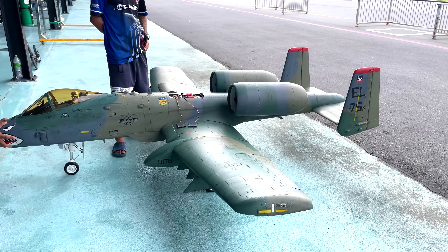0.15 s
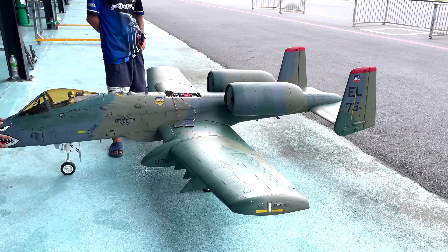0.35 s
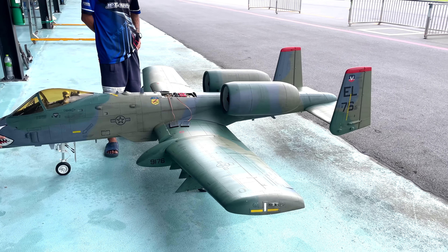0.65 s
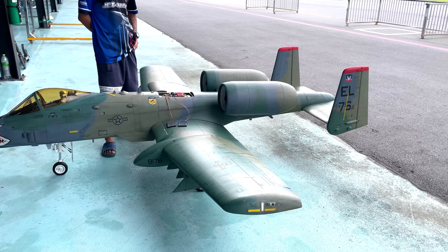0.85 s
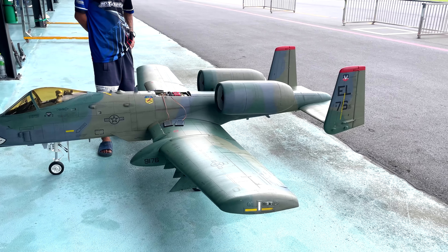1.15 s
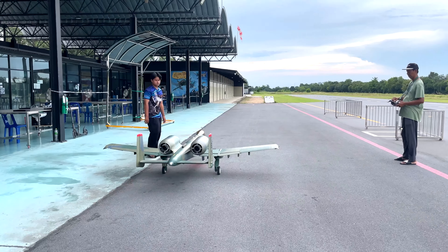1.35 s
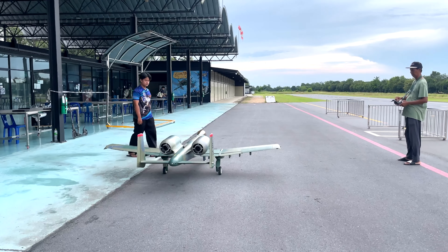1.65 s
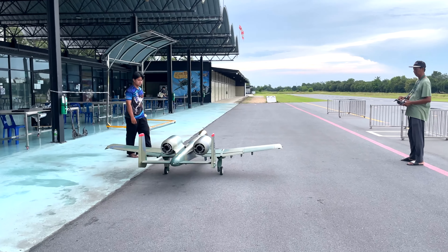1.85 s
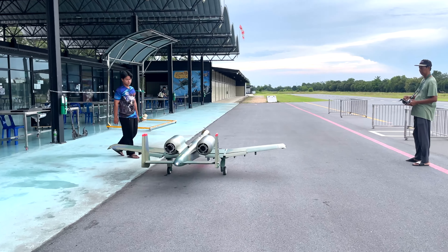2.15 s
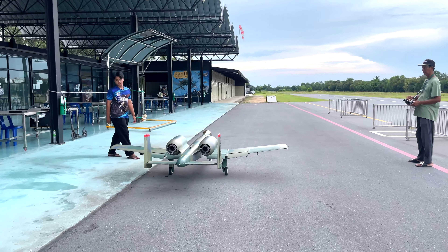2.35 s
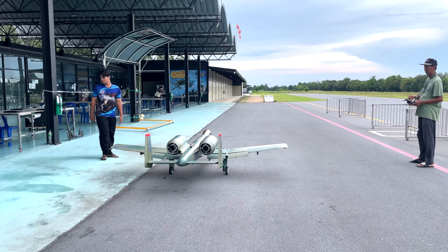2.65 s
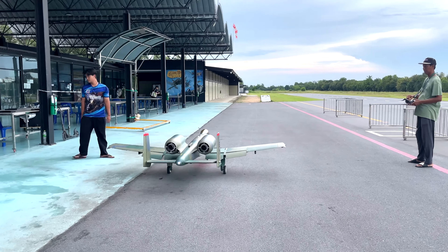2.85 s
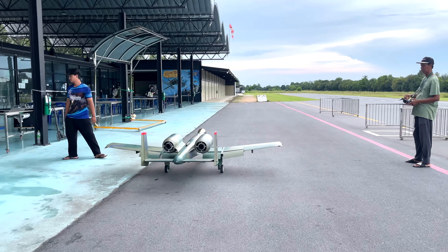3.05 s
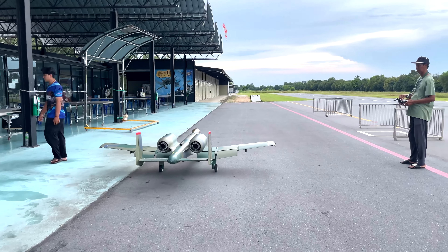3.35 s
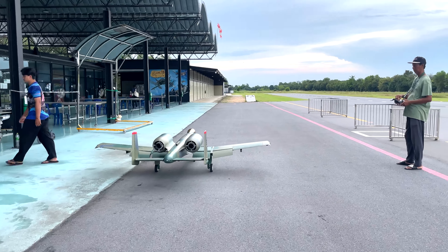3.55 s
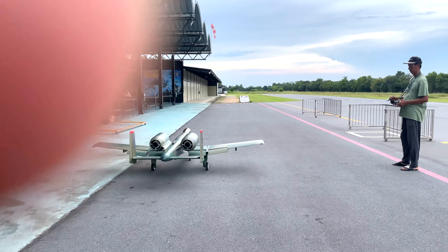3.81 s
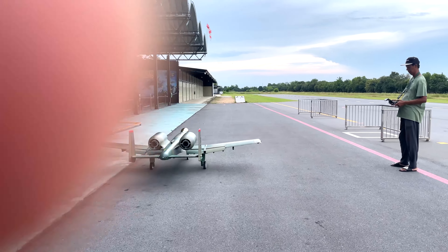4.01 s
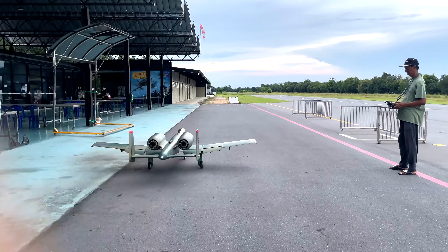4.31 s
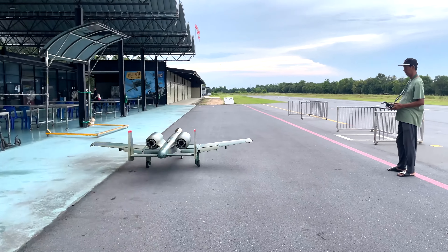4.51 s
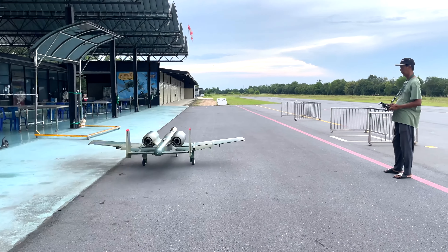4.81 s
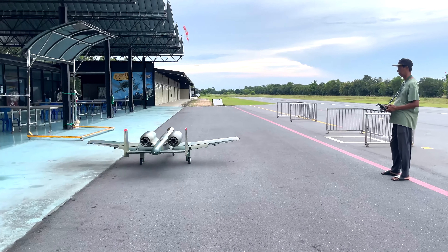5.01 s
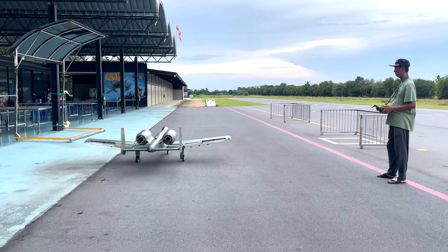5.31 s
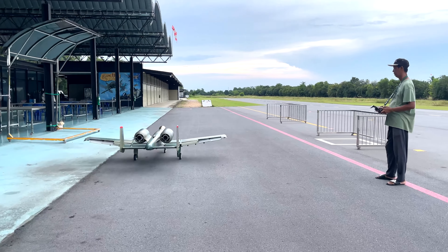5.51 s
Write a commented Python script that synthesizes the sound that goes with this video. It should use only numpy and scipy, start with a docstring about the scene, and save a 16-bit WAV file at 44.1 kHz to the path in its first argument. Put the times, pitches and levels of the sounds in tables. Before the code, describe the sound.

A model jet's twin turbines whistle and climb in pitch, then their exhaust rushes loudly and buffets the microphone outdoors.

```python
"""On an outdoor apron, a model jet with two turbines speeds up, heard from the side, then from behind.
Beside the intakes, the compressor blades whistle and beat against their own echo from a shelter roof,
over the hollow roar of burning fuel. From behind, the exhaust rushes and buffets the microphone,
while two whines, blurred by the hot gas, climb, level off and sag."""
import sys
import numpy as np
from scipy import signal
from scipy.fft import rfft, irfft
from scipy.io import wavfile

SR = 44100
rng = np.random.default_rng(int(sys.argv[2]) if len(sys.argv) > 2 else 0)


def transcribe(signal):
    """Save signal, clipped to [-1, 1], as a 16-bit WAV file at the path in sys.argv[1]."""
    frames = np.atleast_2d(signal).T
    limited = np.clip(frames, -1, 1)
    pcm = np.round(limited * 32767).astype(np.int16)
    wavfile.write(sys.argv[1], SR, pcm)


N = 250046
T = np.arange(N) / SR
HZ = np.fft.rfftfreq(N, 1 / SR)

# Shaft speeds heard from behind. Each row: time in seconds, first and second engine's speed in Hz.
REAR_SPEEDS = [(1.3, 590.6, 593.8), (1.7, 625, 628.8), (2.1, 665, 674.4), (2.5, 703.1, 721.3),
               (3, 747.2, 772.8), (3.5, 786.3, 810), (3.95, 811.3, 830), (4.3, 819.4, 833),
               (4.7, 813.1, 821.9), (5.67, 787.2, 792)]
# Blade tones heard from behind. Each row: multiple of the shaft speed, relative level in dB.
REAR_BLADE_TONES = [(8, -10), (16, 0), (24, -35)]
# A "colour" says how strong a noise is at each pitch. Each row: frequency in Hz, relative level in dB.
GAS_HISS_COLOUR = [(2000, -4), (3400, 0), (4100, -2), (5100, 2), (5550, -6.5), (6300, 0.5), (7500, -2.5),
                   (8600, -0.5), (9600, 2), (11000, -25)]
WAKE_COLOUR = [(30, -34), (60, 6), (110, 4.5), (170, -12), (300, -23.5), (800, -66)]


def from_db(db):
    """Turns decibels into a factor to multiply a sound by."""
    return 10 ** (np.asarray(db) / 20)


def unit(x):
    """Scales a signal to an average strength (rms) of 1."""
    return x / np.sqrt(np.mean(x ** 2) + 1e-20)


def over_time(rows):
    """Joins a table's points into curves over time, one for each column after the first."""
    seconds, *columns = np.transpose(rows)
    return [np.interp(T, seconds, column) for column in columns]


def over_hz(rows):
    """Joins a table's points into curves over frequency, one for each column after the first."""
    hz, *columns = np.transpose(rows)
    return [np.interp(np.log(HZ + 1), np.log(hz), column) for column in columns]


def bell(at_s, width_s):
    """A smooth rise and fall; the width says how far it spreads to each side."""
    return np.exp(-.5 * ((T - at_s) / width_s) ** 2)


def swells_db(rows):
    """Adds smooth swells and lulls into one level curve."""
    return sum(db * bell(at_s, width_s) for at_s, db, width_s in rows)


def wander(rate_hz):
    """A smooth random wobble, no faster than about the given rate."""
    return unit(irfft(rfft(rng.standard_normal(N)) * np.exp(-.5 * (HZ / rate_hz) ** 2), N))


def turbulence(colour, flutter_db, flutter_hz):
    """Two separate noises that swell together as swirls of air pass."""
    roll_off = 1 / (1 + (HZ / colour[-1][0]) ** 8)
    noise = irfft(rfft(rng.standard_normal((2, N))) * from_db(over_hz(colour)[0]) * roll_off, N)
    return unit(noise * from_db(flutter_db * wander(flutter_hz)))


def eddies(colour):
    """Swirling air with its pressure swings limited, so each gust lands with its own force."""
    swing = signal.hilbert(turbulence(colour, flutter_db=-1, flutter_hz=35))
    return unit(swing.real / np.hypot(abs(swing), 1))


def resonate(x, centre_hz, width_hz):
    """Brings out a band of sound around a moving pitch."""
    turn = np.exp(2j * np.pi * np.cumsum(centre_hz) / SR)
    decay = np.exp(-np.pi * width_hz / SR)
    return unit((turn * signal.lfilter([1 - decay], [1, -decay], x / turn)).real)


def ringing(modes, drift_hz=14):
    """Streaming gas sets off resonances; each flutters and drifts in pitch on its own."""
    sound = np.zeros((2, N))
    for hz, width_hz, db in modes:
        draught = turbulence(GAS_HISS_COLOUR, flutter_db=2.5, flutter_hz=14)
        centre_hz = hz + drift_hz * wander(1.8)
        sound += from_db(db) * resonate(resonate(draught, centre_hz, 2 * width_hz), centre_hz, width_hz)
    return sound


def delayed(x, seconds):
    """The same sound arriving later."""
    return np.interp(T - seconds, T, x, left=0)


def bounce(pair, seconds, share):
    """A quick echo off hard surfaces strengthens some pitches and weakens others."""
    return pair + share * np.array([delayed(x, seconds) for x in pair])


def shelter(x, fade_s):
    """The open steel shelter scatters sound into two blurs of echoes, falling 60 dB per fade_s."""
    tail = rng.standard_normal((2, SR // 2)) * from_db(-60 * T[:SR // 2] / fade_s)
    return signal.fftconvolve(x[None], tail / np.linalg.norm(tail[0]), axes=1)[:, :N]


def microphone(pair, ports):
    """The right opening hears part of the left one's sound, shifted in phase, and part of its own."""
    lead, likeness, balance_db = over_hz(ports)
    left, other = rfft(pair)
    right = (likeness * left + np.sqrt(1 - likeness ** 2) * other) * np.exp(-1j * lead)
    tilt = from_db(balance_db / 2)
    return irfft(np.array([left * tilt, right / tilt]), N)


def thrust_db(power, leave_s=3.8, fade_db_per_s=1):
    """Exhaust noise grows as a power of the shaft speed and fades as the jet rolls away."""
    shaft_hz = over_time(REAR_SPEEDS)[0]
    return 20 * power * np.log10(shaft_hz / shaft_hz.max()) - fade_db_per_s * np.maximum(T - leave_s, 0)


def wake_buffet():
    """Air stirred up by the jet tumbles over the microphone."""
    return from_db(-28.5) * turbulence(WAKE_COLOUR, flutter_db=2, flutter_hz=3.3)


def gusts(thump_width_s=.016):
    """Hard swirls hit the microphone, each with a low thump, a slap and a slow, deep push."""
    # Each row: time in seconds, slap level in dB, slap width in seconds, thump level in dB.
    hits = [(1.309, -38, 0.0067, -23), (1.39, -38, 0.022, -26.5), (1.542, -25.5, 0.059, -19.5),
            (1.68, -24.5, 0.028, -22.5), (1.758, -21, 0.0079, -25), (1.901, -26, 0.016, -21.5),
            (2.125, -40, 0.016, -20), (2.754, -19, 0.0086, -29), (2.889, -29, 0.014, -36),
            (2.955, -17.5, 0.028, -23), (3.151, -16.5, 0.009, -36), (3.244, -24.5, 0.022, -27),
            (3.413, -19.5, 0.017, -25), (3.516, -15.5, 0.015, -25), (3.569, -22, 0.0061, -22.5),
            (3.793, -20.5, 0.0095, -28), (3.967, -16, 0.008, -24.5), (4.237, -24, 0.013, -21.5),
            (4.602, -22, 0.0085, -33), (4.83, -16, 0.0063, -26), (4.869, -11, 0.0061, -28),
            (5.251, -22, 0.0079, -27), (5.354, -19, 0.01, -17)]
    # Colours of the slap and the push. Each row: frequency in Hz, relative level in dB.
    slap_colour = [(55, -2), (260, 4.5), (400, -9.5), (700, -18), (2000, -40)]
    push_colour = [(26, -11), (40, -10), (65, -5)]
    thumps = sum(from_db(db) * bell(at_s, thump_width_s) for at_s, _, _, db in hits)
    slaps = sum(from_db(db) * bell(at_s, width_s) for at_s, db, width_s, _ in hits)
    pushes = np.max([from_db(db - 12) * bell(at_s, 2 * thump_width_s) for at_s, _, _, db in hits], axis=0)
    return thumps * eddies(WAKE_COLOUR) + slaps * eddies(slap_colour) + pushes * eddies(push_colour)


def exhaust_rumble():
    """The churning exhaust rumbles, louder as the shaft turns faster."""
    # Colour of the churning. Each row: frequency in Hz, relative level in dB.
    colour = [(60, -5), (140, 4), (215, 1.5), (290, -3.5), (400, -6.5), (600, -12.5), (1500, -16)]
    # Centre of the rumble. Each row: time in seconds, pitch in Hz.
    pitch = [(1.3, 194), (2.3, 174), (2.9, 200), (4.2, 245.5), (5.67, 231)]
    churn = turbulence(colour, flutter_db=1.4, flutter_hz=27.1)
    return from_db(-21 + thrust_db(power=2.27)) * resonate(churn, over_time(pitch)[0], width_hz=110)


def combustion_roar(fade_db_per_s=2):
    """Burning fuel makes a hollow roar that slowly fades."""
    # Colour of the roar. Each row: frequency in Hz, relative level in dB.
    colour = [(42, -31), (65, -11.5), (135, -16.5), (180, -4.5), (218, -0.5), (260, -4.5), (320, -19.5),
              (390, -9), (470, -8), (600, -21.5), (1200, -22), (1700, -33), (4000, -73)]
    return from_db(-24.5 - fade_db_per_s * T) * turbulence(colour, flutter_db=1.5, flutter_hz=10)


def intake_hiss():
    """Air hisses as it is drawn into the engines."""
    # Colour of the hiss. Each row: frequency in Hz, relative level in dB.
    colour = [(900, -30), (1700, -6.5), (2000, 3.5), (2400, -2), (3000, 3.5), (3700, -4.5), (4600, 0),
              (5700, -10), (6800, 4), (7400, -8.5), (8200, -11), (9500, -12), (11500, -2.5), (12600, -10),
              (13600, -32)]
    return from_db(-38.5) * turbulence(colour, flutter_db=1, flutter_hz=11)


def exhaust_rush():
    """Hot gas mixes with the air: it rushes, tears at full thrust, hisses, howls and rings the tailpipe."""
    # Colours of the rush and its tearing edge. Each row: frequency in Hz, relative level in dB.
    rush_colour = [(200, -2), (330, 4), (480, 0), (620, -5.5), (800, 1), (1230, 0), (1500, -7),
                   (2300, -12.5), (2800, -10.5), (3500, -19.5), (6000, -37)]
    tearing_colour = [(950, -9), (1250, 6.5), (1700, -2.5), (2300, -8.5), (3700, -5.5), (5500, -16)]
    # Resonances of the howl and the tailpipe. Each row: pitch in Hz, width in Hz, base level in dB.
    howl_modes = [(797, 97, -40), (1086, 79, -40.5)]
    pipe_modes = [(2065, 150, -49), (2736, 230, -47)]
    # Swells and lulls of rush and tailpipe. Each row: time in seconds, change in dB, width in seconds.
    rush_swells = [(2.26, 2.5, 0.13), (3.78, 1.5, 0.18), (4.95, -0.3, 0.37)]
    pipe_swells = [(1.38, -7, 0.067), (1.68, 3.5, 0.12), (2.17, 7.5, 0.044), (2.4, -12, 0.071),
                   (3.06, 3, 0.03)]
    flow_db = thrust_db(power=1.51) + swells_db(rush_swells)
    rush = from_db(-30 + flow_db) * turbulence(rush_colour, flutter_db=.43, flutter_hz=19)
    tearing = from_db(-41 + 2.9 * flow_db) * turbulence(tearing_colour, flutter_db=2, flutter_hz=11)
    hiss = from_db(-39 + .63 * flow_db) * turbulence(GAS_HISS_COLOUR, flutter_db=.85, flutter_hz=21)
    howl = from_db(flow_db) * ringing(howl_modes)
    tailpipe = from_db(thrust_db(power=1) + swells_db(pipe_swells)) * ringing(pipe_modes)
    return bounce(rush + tearing + hiss + tailpipe, seconds=.0059, share=.22) + howl


def high_hiss(onset_hz=692, onset_width_hz=18):
    """A high hiss fades in around 2.4 s and then sits just below the whine."""
    # Colour of the hiss. Each row: distance below the whine in Hz, relative level in dB.
    colour = [(3000, 0), (4000, -4), (4800, -24)]
    shaft_hz = over_time(REAR_SPEEDS)[0]
    fade_in = 1 / (1 + np.exp((onset_hz - shaft_hz) / onset_width_hz))
    noise = signal.hilbert(turbulence(colour, flutter_db=.5, flutter_hz=20))
    below_whine = np.exp(-2j * np.pi * REAR_BLADE_TONES[1][0] * np.cumsum(shaft_hz) / SR)
    return from_db(-47.5) * fade_in * (noise * below_whine).real


def exhaust_whine(second_engine_db=-5, waver_db=2, echo_db=-8, echo_top_hz=13900):
    """Blade tones blur as they cross the hot jet; the shelter's echo trails below them as they climb."""
    # Loudness of the lowest tone and of the two above it. Each row: time in seconds, base level in dB.
    low_levels = [(2.9, -53), (3.4, -45), (4.12, -47), (4.26, -36.5), (4.42, -51), (4.88, -44), (5.5, -47)]
    high_levels = [(1.3, -32), (1.6, -35.5), (1.85, -32.5), (2.03, -32.5), (2.14, -31.5), (2.6, -35),
                   (2.9, -37), (3.4, -42), (4.3, -45.5), (5.67, -43)]
    # Narrow, medium and wide blur. Each row: strength, spread to each side in Hz.
    blurs = [(.6, 22), (.55, 70), (.16, 160)]
    whine = np.zeros(N)
    low = from_db(over_time(low_levels)[0])
    for shaft_hz, engine_db in zip(over_time(REAR_SPEEDS), (0, second_engine_db)):
        angle = 2 * np.pi * np.cumsum(shaft_hz) / SR
        high = from_db(over_time(high_levels)[0] + waver_db * wander(3.3))
        narrow, medium, wide = (share * (wander(hz) + 1j * wander(hz)) for share, hz in blurs)
        scatters = 3 * narrow + medium, narrow + medium + wide, narrow + medium  # low tones blur less
        for (multiple, db), scatter, gain in zip(REAR_BLADE_TONES, scatters, (low, high, high)):
            tone = unit((scatter * np.exp(1j * multiple * angle)).real)
            whine += gain * from_db(engine_db + db) * tone
    early = np.array([whine, shelter(whine, fade_s=.089)[0]])
    returned = irfft(rfft(whine) * (HZ < echo_top_hz), N)
    return early + from_db(echo_db) * shelter(returned, fade_s=1.3)


def roof_echo(tones, delay_s=2071 / SR, share=.68, dull_above_hz=4600):
    """The roof sends tones back late and with less treble, and the shelter scatters them."""
    returned = irfft(rfft(tones) * np.minimum(1, dull_above_hz / (HZ + 1)) ** 2.13, N)
    left, other = shelter(returned, fade_s=.49)
    return np.array([tones + share * delayed(returned, delay_s) + from_db(-21) * left, 1.9 * other])


def intake_whistle(near_db=-24, far_db=-25, far_fade_db_per_s=7, drift_db=4, shimmer_db=2.35):
    """Compressor blades make clean rising tones; their echo lags in pitch and beats against them."""
    # Shaft speeds. Each row: time in seconds, near and far engine's speed in Hz.
    speeds = [(0, 551.2, 561), (.3, 561.4, 567.2), (.41, 567.2, 570.3), (.62, 574.8, 576.2),
              (.73, 580.1, 580.4), (1.05, 593.6, 592.3), (1.3, 603.6, 600.5)]
    # Each engine's blade tones. Each row: multiple of the shaft speed, relative level in dB.
    near_tones = [(8, -2), (16, -5.5), (24, -14.5)]
    far_tones = [(6, -17), (12, -23), (18, -11.5), (24, -29)]
    # How the lowest and the upper tones swell. Each row: time in seconds, change in dB.
    near_low_swell = [(0, -6), (.18, 0.5), (.26, -1), (.35, -10.5), (.5, 6.5), (.6, -2.5), (.68, -1.5),
                      (.82, 5), (.95, -2.5), (1.15, 2.5), (1.3, -6.5)]
    near_upper_swell = [(0, -1), (.15, 2.5), (.22, -10), (.28, 1), (.42, 4), (.49, -11), (.57, 4), (.8, 0),
                        (.87, -6), (.98, 2.5), (1.14, -3), (1.25, 2.5)]
    far_low_swell = [(0, 1.5), (.35, 1), (.52, -17), (.63, 6), (.72, -14), (.83, -1), (1.08, 0), (1.3, 2)]
    near = near_tones, near_db, over_time(near_low_swell)[0], over_time(near_upper_swell)[0]
    far = far_tones, far_db - far_fade_db_per_s * T, over_time(far_low_swell)[0], drift_db * wander(5.9)
    whistle = np.zeros(N)
    for shaft_hz, (tones, engine_db, low_db, upper_db) in zip(over_time(speeds), (near, far)):
        angle = 2 * np.pi * np.cumsum(shaft_hz) / SR
        for multiple, db in tones:
            swell_db = low_db if multiple == tones[0][0] else upper_db
            gain = from_db(engine_db + db + swell_db + shimmer_db * wander(21))
            whistle += gain * np.sin(multiple * angle)
    return roof_echo(whistle)


def beside(drop_s=.845, drop_db=-3, fall_s=.02):
    """Beside the intakes, the whistle rides over a roar and a hiss that step down together."""
    # How the microphone's two openings differ. Each row: frequency in Hz, left's lead in radians,
    # likeness from 0 to 1, left's level over the right in dB.
    ports = [(194, 0, 1, 1.5), (970, 0.5, 0.95, 2.5), (1860, -1, 0.14, 2.5), (3100, 1.4, 0.74, 0.5),
             (4060, 1.16, 1, 9), (4500, 0.6, 0.89, 1), (5230, 1.5, 1, -1), (6600, 1.33, 0.6, 0.5),
             (7570, -2, 0.9, -1), (8060, -2.5, 1, -5.5), (10120, -3.5, 0.98, -1), (13700, -14.5, 0.23, -9)]
    drop = from_db(drop_db * np.clip((T - drop_s) / fall_s + .5, 0, 1))
    noise = drop * (combustion_roar() + intake_hiss())
    return microphone(bounce(noise, seconds=.0089, share=.29) + intake_whistle(), ports)


def behind():
    """Behind the jet, the whine and a high hiss carry through the blast of the exhaust."""
    # How the microphone's two openings differ. Each row: frequency in Hz, left's lead in radians,
    # likeness from 0 to 1, left's level over the right in dB.
    ports = [(60, 0.27, 0.97, 1), (343, 0.25, 0.98, 2), (765, 0.92, 0.72, 6.5), (1176, 1.83, 0.87, 7),
             (1450, 0, 0.087, 4), (2240, -3, 0.067, -2), (2940, 1.7, 0.61, -1.5), (5250, 0, 0.34, 2.5),
             (6600, -1.2, 0.37, 1), (7630, -2, 1, 1), (9560, -4, 1, -1.5), (11600, -5, 0.79, 0),
             (13300, -6, 0.99, 0)]
    blast = exhaust_rush() + wake_buffet() + exhaust_rumble() + gusts()
    return microphone(blast + exhaust_whine() + high_hiss(), ports)


def scene(jump_s=1.293, blend_s=.005):
    """The listening point jumps from beside the jet to behind it."""
    blend = np.pi / 2 * np.clip((T - jump_s) / blend_s + .5, 0, 1)
    return np.cos(blend) * beside() + np.sin(blend) * behind()


def record(dry, low_cut_hz=35, high_cut_hz=15700):
    """Takes away the deepest bass and the highest treble."""
    bass_trimmed = irfft(rfft(dry) / np.sqrt(1 + (low_cut_hz / (HZ + 1)) ** 10), N)
    treble_filter = signal.firwin(511, high_cut_hz, window=("kaiser", 9), fs=SR)
    return signal.oaconvolve(bass_trimmed, treble_filter[None], "same")


dry = scene()
out = record(dry)
transcribe(out)
```